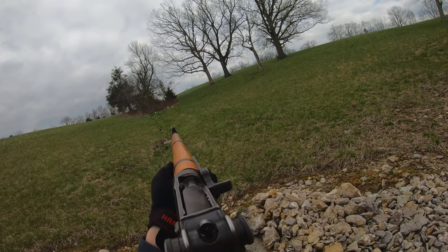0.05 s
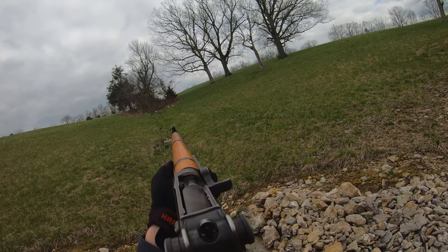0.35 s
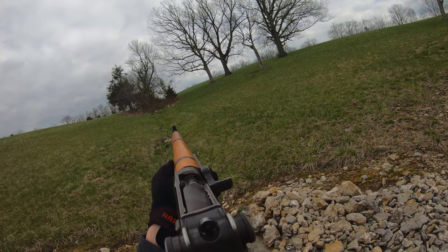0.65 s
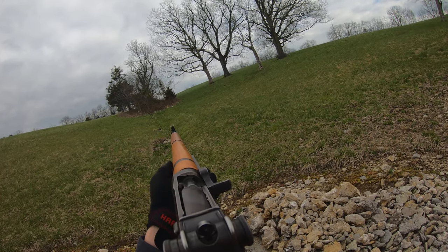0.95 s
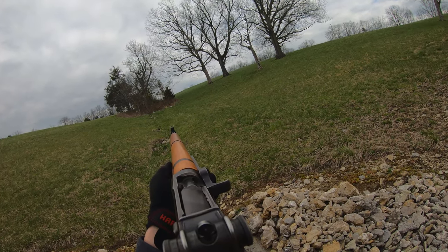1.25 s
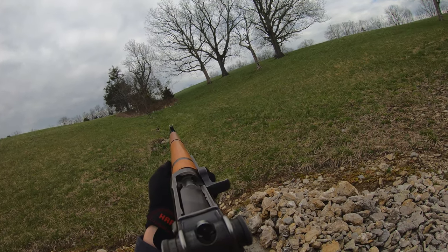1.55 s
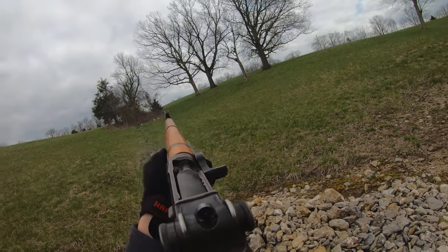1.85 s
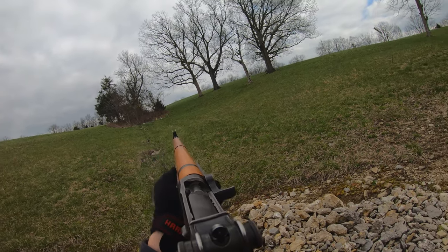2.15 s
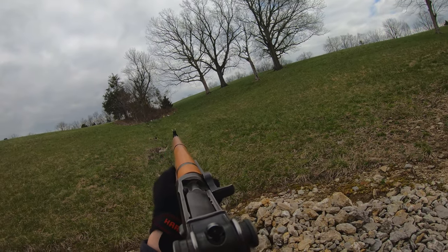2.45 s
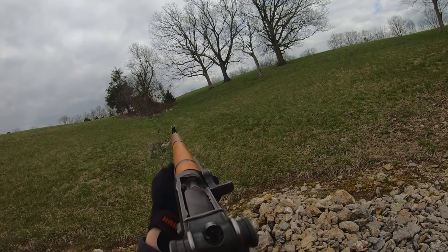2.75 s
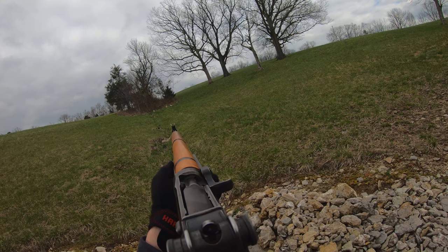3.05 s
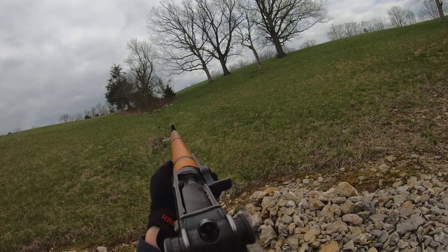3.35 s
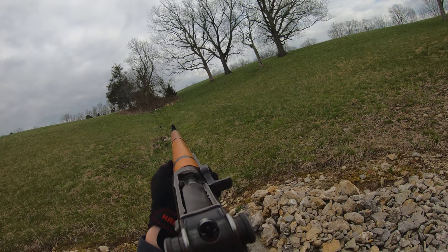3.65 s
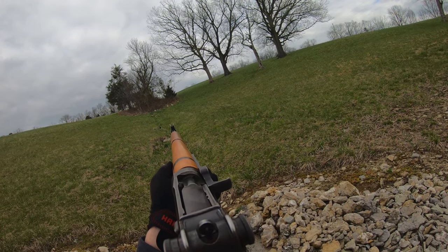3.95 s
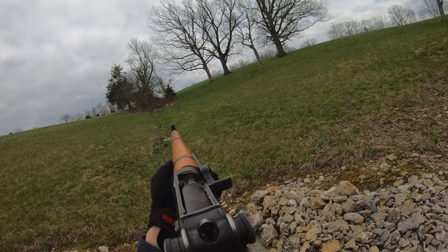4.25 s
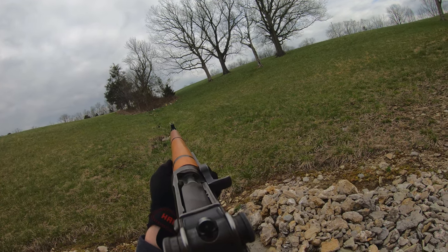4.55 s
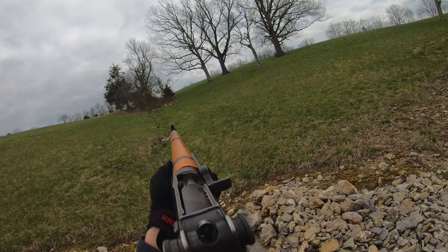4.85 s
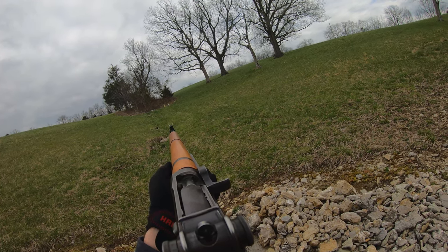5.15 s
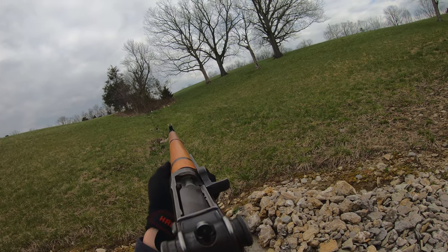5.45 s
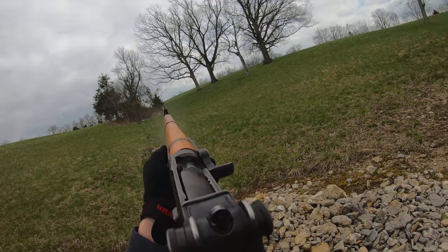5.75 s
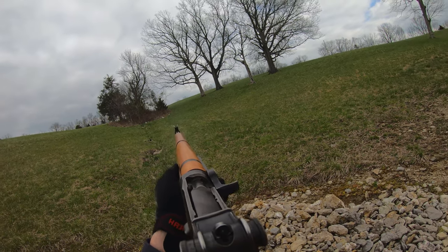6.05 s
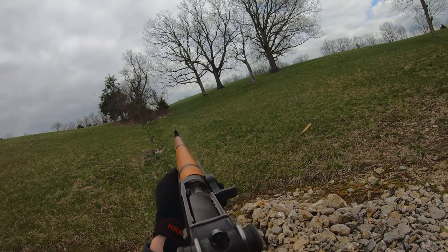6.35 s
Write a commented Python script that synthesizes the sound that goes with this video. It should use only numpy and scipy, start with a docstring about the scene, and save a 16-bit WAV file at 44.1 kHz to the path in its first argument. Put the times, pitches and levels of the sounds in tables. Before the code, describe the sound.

Wind rumbles on the microphone as a rifle fires twice with rolling echoes, a brass case bouncing on stones and the clip pinging out.

```python
"""Wind buffets the microphone of a camera worn by a shooter on a hillside; then come two rifle shots.
Each muzzle blast overloads the microphone and ducks its gain, the bolt cycles, and the near slope and
far woods throw the report back. The first spent case rings and skips over stones; after the second
shot the empty steel clip springs out with a ping. Now and then the camera mount knocks softly."""
import sys
import numpy as np
from scipy import signal
from scipy.fft import rfft, irfft
from scipy.io import wavfile
from scipy.ndimage import uniform_filter1d, minimum_filter1d

SR = 44100
rng = np.random.default_rng(int(sys.argv[2]) if len(sys.argv) > 2 else 0)


def to_wav(s):
    """Save 16-bit WAV."""
    ch = np.atleast_2d(s).T  # columns
    pcm = np.round(np.clip(ch, -1, 1) * 32767)  # PCM
    wavfile.write(sys.argv[1], SR, pcm.astype(np.int16))


N = 286650
TIME = np.arange(N) / SR

# Steel parts of the rifle knocking together. Each row: frequency in Hz, relative level in dB.
STEEL_COLOUR = [(240, -33), (400, 3.5), (2580, -3.5), (4330, -0.5), (6510, -13.5), (7930, -12), (9370, -9),
                (10300, -29.5), (11600, -21.5), (15000, -39)]
# Sign of the difference between the microphone's two ports: left, right.
PORT_SIGNS = np.array([[1], [-1]])


def gain_of(db):
    """Decibels to amplitude."""
    return 10 ** (np.asarray(db) / 20)


def unit_rms(x):
    """Scales to rms 1."""
    return x / np.sqrt(np.mean(x ** 2) + 1e-20)


def add(mix, s, sound):
    """Mixes a sound in at s seconds."""
    part = mix[..., round(s * SR):][..., :sound.shape[-1]]
    part += sound[..., :part.shape[-1]]


def lowpass(x, hz, order=2):
    """Butterworth low-pass filter."""
    return signal.sosfilt(signal.butter(order, min(hz, SR / 2 - 1), fs=SR, output="sos"), x)


def noise(colour, size=N, peaks=(), peak_db=0):
    """Noise of rms 1 with a given spectrum, raised at any resonances."""
    hz = np.fft.rfftfreq(size, 1 / SR)
    colour_hz, colour_db = np.transpose(colour)
    shape = gain_of(np.interp(np.log(hz + 1), np.log(colour_hz + 1), colour_db))
    lift = sum(gain_of(db / 2) / (1 + ((hz - centre) / (width / 2)) ** 2) for centre, width, db in peaks)
    shape *= 1 + gain_of(peak_db) * lift
    return unit_rms(irfft(rfft(rng.standard_normal(size)) * shape, size))


def wander(hz, size=N):
    """Random drift of rms 1, slower than hz."""
    band = np.fft.rfftfreq(size, 1 / SR) < hz
    return unit_rms(irfft(rfft(rng.standard_normal(size)) * band, size))


def swell(t, rise, hold, t60):
    """Envelope from t = 0: straight rise, hold, exponential release, all in seconds."""
    return np.clip(t / rise, 0, 1) * gain_of(-60 * np.maximum(t - rise - hold, 0) / t60)


def burst(colour, t60):
    """A short, dying puff of noise."""
    return noise(colour, size=4096) * gain_of(-60 * TIME[:4096] / t60)


def ring(modes, spin_hz=0, tumble=0, contact_s=0.00042):
    """One blow: the modes swell during contact and die away, wavering if the object tumbles."""
    t = TIME[:SR]
    out = np.zeros(len(t))
    for hz, db, t60 in modes:
        angle = 2 * np.pi * spin_hz * rng.uniform(0.6, 1.0) * t + rng.uniform(-1.6, 1)
        facing = 1 - tumble + tumble * np.cos(angle)
        out += facing * gain_of(db - 60 * t / t60) * np.sin(2 * np.pi * hz * t)
    return out * (1 - np.exp(-t / contact_s))


def wind(rasp_db=3.5, buffet_db=1.5, puffs_db=2, flutter_db=2.5, air_db=-67, ports_db=-17):
    """Slow buffets and faster, rasping eddies right on the microphone, over the air of the open hill."""
    # Wind strength. Each row: time in seconds, relative levels of buffeting and of eddies in dB.
    strength = [(0.0, -20.5, -36), (1.6, -19, -32), (2.1, -15, -34), (2.2, -14.5, -30.5), (2.5, -25, -42.5),
                (2.85, -23.5, -37.5), (3.0, -20.5, -40.5), (3.15, -35, -40), (3.25, -16, -47),
                (3.4, -30.5, -38.5), (3.45, -17.5, -29), (4.3, -26, -38), (4.65, -16.5, -29),
                (5.4, -17.5, -37.1), (5.55, -18, -28.3), (6.15, -5.5, -27.5), (6.3, -14.5, -27.5),
                (6.5, -14.5, -37)]
    # Sudden low puffs. Each row: centre in seconds, relative level in dB, length in seconds.
    puffs = [(0.919, -24, 0.1), (2.191, -21.5, 0.042), (3.25, -29.5, .07), (3.734, -27, 0.062),
             (4.557, -32.5, 0.059), (5.472, -39, .05), (6.151, -26, 0.045)]
    # Spectra of buffets, eddies, open air and its difference between the ports.
    # Each row: frequency in Hz, relative level in dB.
    buffet_colour = [(4, -1.5), (15, 3.5), (27, -1), (45, -6), (60, -8), (80, -25), (130, -51.5),
                     (300, -100)]
    eddy_colour = [(30, -20), (65, 1.5), (100, -3), (150, -15), (250, -28), (500, -42), (1000, -53),
                   (3000, -67), (8000, -88)]
    air_colour = [(100, -4.5), (400, -7), (1000, -11.5), (2000, -19.5), (5000, -23.5), (10000, -26.5),
                  (16000, -28)]
    port_colour = [(100, -10.5), (400, -1.5), (2000, -9.5), (6500, -13.5), (9000, -35), (16000, -44.5)]
    buffet, eddies = noise(buffet_colour), noise(eddy_colour)
    buffet /= np.sqrt(uniform_filter1d(buffet ** 2, size=9000) + 1e-6)  # even until gusts shape it
    rumble = lowpass(eddies, 250, order=1)
    eddies = rumble + (eddies - rumble) * gain_of(rasp_db * wander(33))  # the hiss comes and goes
    times, buffet_levels, eddy_levels = np.transpose(strength)
    buffet *= gain_of(np.interp(TIME, times, buffet_levels) + buffet_db)
    eddies *= gain_of(np.interp(TIME, times, eddy_levels))
    air = noise(air_colour) + PORT_SIGNS * gain_of(ports_db) * noise(port_colour)
    gusts = (buffet + eddies) * gain_of(flutter_db * wander(16))
    puffing = sum(gain_of(db + puffs_db) * np.exp(-(2 * (TIME - s) / span) ** 2) for s, db, span in puffs)
    return gusts + puffing * lowpass(noise(eddy_colour), 480, order=1) + gain_of(air_db) * air


def mount_taps():
    """Dull little knocks in the camera mount."""
    # Soft taps. Each row: start in seconds, gain in dB.
    taps = [(0.108, -54.5), (.253, -66), (.583, -61.5), (.783, -58.5), (5.443, -59.5), (6.106, -57)]
    # Modes of the mount. Each row: frequency in Hz, relative level in dB, t60 in seconds.
    modes = [(606, 6, 0.028), (743, 15, 0.022), (875, -14, 0.012), (1200, -18.5, .02)]
    out = np.zeros(N)
    for s, db in taps:
        add(out, s, gain_of(db) * ring(modes))
    return out


def hammer(t60=0.017, dull_hz=6500):
    """The hammer falls just before each shot: a muffled click inside the closed action."""
    # Hammer falls. Each row: start in seconds, gain in dB.
    falls = [(1.6999, -34), (5.661, -35.5)]
    out = np.zeros(N)
    for s, db in falls:
        add(out, s, gain_of(db) * lowpass(burst(STEEL_COLOUR, t60), dull_hz, order=6))
    return out


def shock(length_s):
    """A sudden rise of pressure and its undershoot."""
    u = TIME[:2048] / length_s
    return (1 - u) * np.exp(-u)


def blast(muzzle_s=0.0033, bullet_db=-17, crack_db=-4, boom_db=-15, ports_db=-20):
    """A barrel's length away: the bullet's hiss leads, then the muzzle gas cracks, booms and sucks back."""
    # Shock fronts, direct and off ground and shooter.
    # Each row: delay in seconds, gain in dB, length in seconds.
    fronts = [(.0034, 3, .0004), (.0078, -6, .00015), (0.0104, 5, .0004), (0.0119, 1, .0002),
              (.016, -3, .0002)]
    # Spectra of the crack, the boom and the short waves that reach the two ports unalike.
    # Each row: frequency in Hz, relative level in dB.
    crack_colour = [(150, -29), (300, -7.5), (750, -4.5), (1000, -6.5), (1500, -11), (1900, -6),
                    (2300, -11), (2900, -10), (4100, -5), (5250, -14.5), (6500, -14), (13000, -23.5),
                    (16000, -28.5)]
    boom_colour = [(41, -24.5), (80, 3), (140, -0.5), (260, -1), (380, -6.5), (570, -11.5), (820, -16.5),
                   (1300, -17), (1900, -42.5), (3300, -100)]
    port_colour = [(300, -24.5), (4000, -33.5), (7000, -17.5), (9500, -1), (10800, -2.5), (12500, -13),
                   (16000, -15)]
    # Resonances: low ones of rifle, shooter and ground, high ones of rifle and camera housing.
    # Each row: centre in Hz, width in Hz, weight in dB.
    body = [(201, 45, 5.5), (283, 18, 4.5), (380, 25, -4.5), (495, 32, -5.5), (650, 28, 1), (800, 42, -2),
            (1024, 40, -2.5), (1194, 36, -3), (1273, 180, 4), (1860, 33, -3.5)]
    housing = [(2710, 47, -0.5), (3180, 70, -1), (3630, 23, -3.5), (4020, 15, -1.5), (4580, 140, -0.5)]
    crack_tail_db, boom_tail_db, tail_t60 = -32.5, -28, 0.46
    suction_depth, deepest_s = 0.58, 0.003
    t = TIME[:8192]
    age = np.maximum(t - muzzle_s, 0)
    tail = gain_of(-60 * t / tail_t60)
    bullet = gain_of(bullet_db) * (t < muzzle_s)
    crack = noise(crack_colour, len(t), peaks=body + housing)
    crack = crack + PORT_SIGNS * gain_of(ports_db) * noise(port_colour, len(t))
    crack_envelope = gain_of(crack_db) * swell(age, rise=0.0006, hold=0, t60=0.089)
    crack *= bullet + crack_envelope + gain_of(crack_tail_db) * tail
    boom = noise(boom_colour, len(t), peaks=body, peak_db=5)
    boom_envelope = gain_of(boom_db) * swell(age, rise=0.014, hold=0.008, t60=0.07)
    boom *= boom_envelope + gain_of(boom_tail_db) * tail
    suction = suction_depth * age / deepest_s * np.exp(1 - age / deepest_s)
    out = crack + boom - suction
    for delay, db, length_s in fronts:
        add(out, delay, gain_of(db) * shock(length_s))
    return out


def scatter(colour, distance, dull_hz, lumpy_db=2.5, roll_db=3.5, low_band_hz=1700):
    """Countless returns, duller as distance goes from 0 to 1; trunks and banks make the low band lumpy."""
    size = len(distance)
    bright, dull = noise(colour, size), lowpass(noise(colour, size), dull_hz)
    wash = np.sqrt(1 - distance) * bright + np.sqrt(distance) * dull
    hz = np.fft.rfftfreq(size, 1 / SR)
    low = irfft(rfft(wash) / (1 + (hz / low_band_hz) ** 4), size)
    lumps = unit_rms(gain_of(lumpy_db * wander(110, size) + roll_db * wander(6.1, size)))
    return wash + low * (lumps - 1)


def echoes(slope_db=-19):
    """The report spreads over the near slope and dies behind the crest; far woods roll it back."""
    # Spectra of the scatter off slope and woods. Each row: frequency in Hz, relative level in dB.
    slope_colour = [(71, -40.5), (120, -6), (298, 3), (357, -3), (412, -2.5), (592, -6), (869, -3.5),
                    (961, -8.5), (1660, -13), (3950, -12.5), (6820, -29.5), (10000, -36), (15000, -53.5)]
    woods_colour = [(120, -46.5), (200, -17.5), (317, -12), (355, -6.5), (465, -2), (968, -1.5),
                    (1660, -8.5), (3930, -17.5), (5760, -38), (6240, -40.5), (6650, -57), (9000, -60.5),
                    (11700, -85), (19800, -120)]
    # Stands of trees. Each row: delay in seconds, gain in dB, then rise, hold and t60 in seconds.
    stands = [(0.361, -34.5, 0.19, 0.061, 1.56), (0.859, -49, 0.33, 0.31, 1)]
    t = TIME[:3 * SR]
    slope = scatter(slope_colour, distance=np.clip((t - 0.13) / 0.28, 0, 1), dull_hz=2600)
    woods = scatter(woods_colour, distance=np.clip((t - 0.65) / 0.67, 0, 1), dull_hz=1600)
    slope *= gain_of(slope_db) * swell(t, rise=0.2, hold=0.03, t60=0.51)
    woods *= sum(gain_of(db) * swell(t - delay, rise, hold, t60) for delay, db, rise, hold, t60 in stands)
    return slope + woods


def rifle_shots():
    """Each close blast is answered by the hillside's wash and by single slaps off banks and trees."""
    # Shots. Each row: start in seconds, blast gain in dB, echo gain in dB.
    shots = [(1.7197, 20, -1), (5.68, 20, 0)]
    # Single returns. Each row: delay in seconds, relative level in dB.
    slaps = [(.108, -14), (.131, -30.5), (.2, -13.5), (.283, -17.5), (.425, -31.5), (.456, -26),
             (0.475, -27), (.532, -30), (.59, -31), (.786, -35.5)]
    # Spectrum of a return. Each row: frequency in Hz, relative level in dB.
    slap_colour = [(120, -28), (300, -6), (1000, -5), (1700, -15.5), (4000, -18.5), (6000, -26),
                   (12000, -79)]
    out = np.zeros((2, N))
    for s, blast_db, echo_db in shots:
        add(out, s, gain_of(blast_db) * blast())
        add(out, s, gain_of(echo_db) * echoes())
        for delay, db in slaps:
            slap = lowpass(burst(slap_colour, t60=0.034), 5100, order=6)  # air absorbs the treble
            add(out, s + delay, gain_of(echo_db + db) * slap)
    return out


def bolt():
    """The action knocks and rattles as it cycles, close to the microphone."""
    # Knocks. Each row: start in seconds, gain in dB, t60 in seconds.
    knocks = [(1.7458, 6, 0.031), (1.7847, -3.5, 0.05), (1.791, -2.5, 0.029), (1.827, -17, 0.027),
              (1.8623, -18, 0.042), (5.7423, -2, 0.038), (5.7465, 1, .022), (5.785, -25, 0.022)]
    out = np.zeros(N)
    for s, db, t60 in knocks:
        add(out, s, gain_of(db) * burst(STEEL_COLOUR, t60))
    return out


def spent_case(damping=0.12, rest_s=3.34, rest_t60=0.35):
    """Each landing ticks on stone, damps the old ring of the brass and starts a new one."""
    # Landings. Each row: start in seconds, then ring gain, side-mode boost and tick gain in dB.
    landings = [(2.7305, -21, 7, -27.5), (2.7383, -14, -4, -28), (2.783, -55, 0, -48), (2.811, -51, 3, -51),
                (2.861, -42, 3, -62), (2.967, -39.5, 3, -49), (3.090, -45, 8, -55), (3.224, -54, 12, -56),
                (3.271, -39.5, 6, -46.5), (3.319, -47, 1, -53), (3.402, -71.5, 2, -51)]
    # Modes of the brass. Each row: frequency in Hz, relative level in dB, t60 in seconds.
    brass_modes = [(8070, -27.5, 0.32), (9934, -3, 0.45), (10010, -11.5, 0.316), (10230, -13, 0.21),
                   (14380, -28, .35), (14360, -29, .3)]
    # Spectrum of brass on stone. Each row: frequency in Hz, relative level in dB.
    tick_colour = [(500, -37), (1100, 8), (2000, -3.5), (3000, 4), (5000, -0.5), (9000, -3), (12000, -28.5),
                   (16000, -44)]
    ticks, ringing = np.zeros(N), np.zeros(N)
    for s, ring_db, boost_db, tick_db in landings:
        add(ticks, s, gain_of(tick_db) * lowpass(burst(tick_colour, t60=0.013), 8500, order=1))
        ringing *= 1 - damping * np.clip((TIME - s) / 0.003, 0, 1)
        # Glancing blows bring out the modes either side of the main ring.
        modes = [(hz, db if 9000 < hz < 11000 else db + boost_db, t60) for hz, db, t60 in brass_modes]
        add(ringing, s, gain_of(ring_db) * ring(modes, spin_hz=35.6, tumble=0.33))
    settling = gain_of(-60 * np.maximum(TIME - rest_s, 0) / rest_t60)  # the stones stop the ring
    return ticks + ringing * settling


def empty_clip(snap_db=6, clack_db=4):
    """The latch clacks open and the spring steel spins away, ringing."""
    ejections = [(5.8017, -15.5)]
    # Modes of the spring steel. Each row: frequency in Hz, relative level in dB, t60 in seconds.
    modes = [(1000, -22, 3), (3150, -23, 0.45), (3420, 3.5, 0.17), (3830, 2, 0.38), (3890, -11, 1.28),
             (3850, -16, 0.51), (4511, -14, 0.51), (6095, -21.5, 1.17), (9440, -19, 0.53),
             (9448, -38.5, 0.92), (10100, -24, .7), (12030, -30, .45)]
    out = np.zeros(N)
    for s, db in ejections:
        add(out, s, -gain_of(snap_db) * lowpass(shock(0.00055), 4100))
        add(out, s, gain_of(clack_db) * lowpass(burst(STEEL_COLOUR, t60=0.0095), 4500, order=1))
        add(out, s, gain_of(db) * ring(modes, spin_hz=11.54, tumble=0.25))
    return out


def gain_control(x, trigger=0.38, deepest_db=-19, hold_s=0.44, look_ahead_s=0.004, recovery_per_s=0.8):
    """Loud sound above the rumble pulls the camera's gain down at once; it holds, then creeps back."""
    mid = x.mean(0)
    level = abs(mid - lowpass(mid, 300, order=1)) + 1e-9
    wanted = np.clip(trigger / level, gain_of(deepest_db), 1)
    hold = round(hold_s * SR)
    held = minimum_filter1d(wanted, hold, origin=(hold - 1) // 2 - round(look_ahead_s * SR))
    regained = recovery_per_s * TIME
    gain = np.minimum.accumulate(held - regained) + regained
    return x * uniform_filter1d(gain, size=128)


def scene():
    """The hillside from the shooter's position; nearly mono, as the two ports lie close together."""
    return hammer() + rifle_shots() + bolt() + empty_clip() + mount_taps() + wind() + spent_case()


def record(dry, ceiling=0.72, edge_hz=15900):
    """Each blast ducks the wind and still saturates the camera, which then cuts the highest treble."""
    ducked = gain_control(dry)
    squashed = ducked / (1 + (ducked / ceiling) ** 4) ** (1 / 4)
    band_limit = signal.firwin(511, edge_hz, window=("kaiser", 9), fs=SR)
    return signal.oaconvolve(squashed, band_limit[None], "same")


dry = scene()
out = record(dry)
to_wav(out)
```